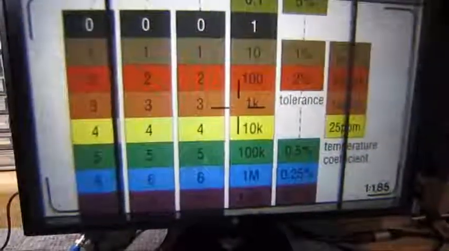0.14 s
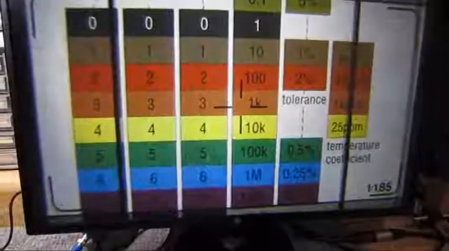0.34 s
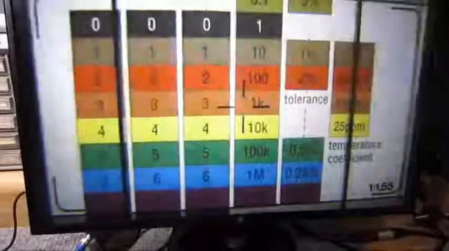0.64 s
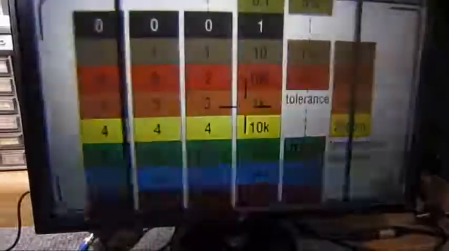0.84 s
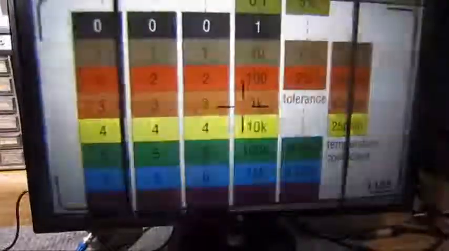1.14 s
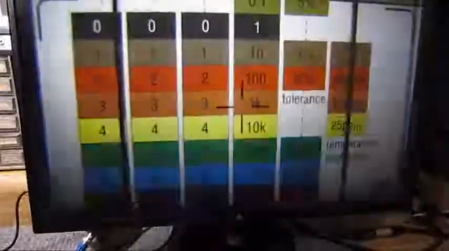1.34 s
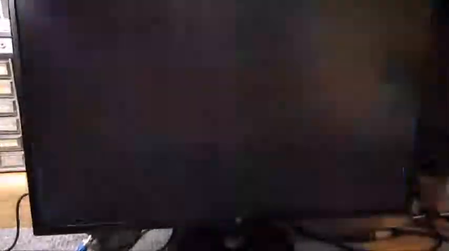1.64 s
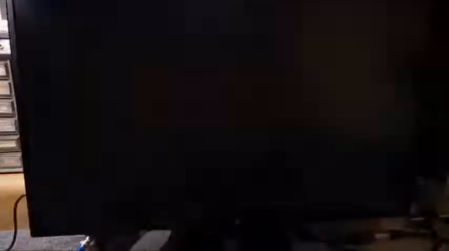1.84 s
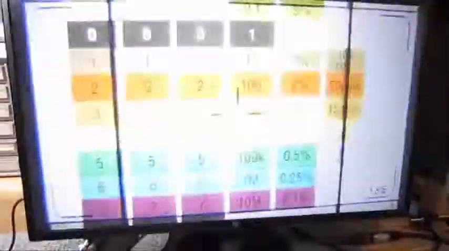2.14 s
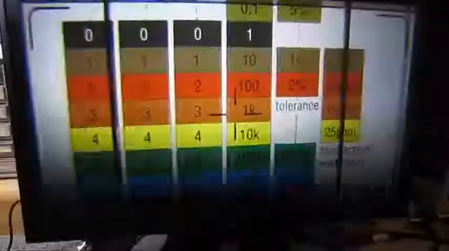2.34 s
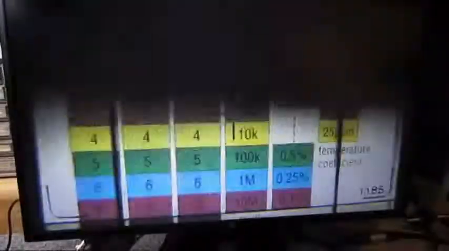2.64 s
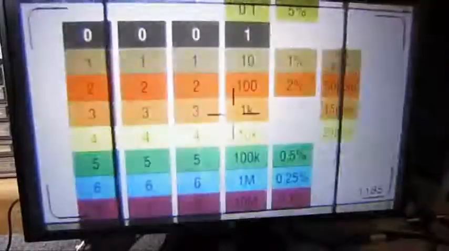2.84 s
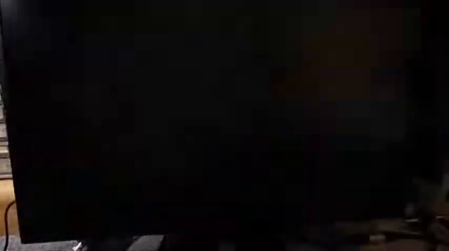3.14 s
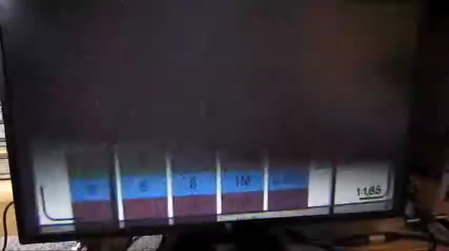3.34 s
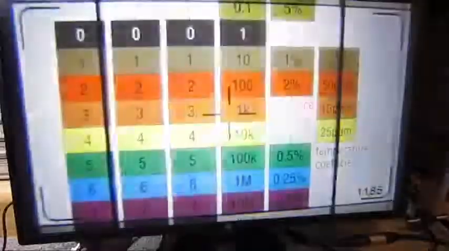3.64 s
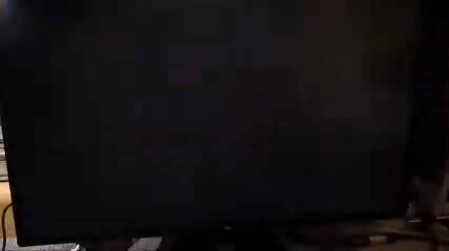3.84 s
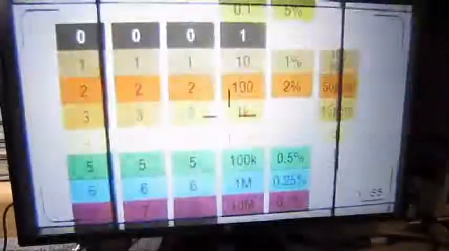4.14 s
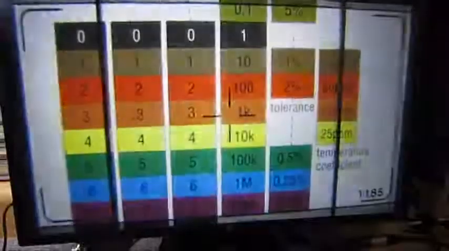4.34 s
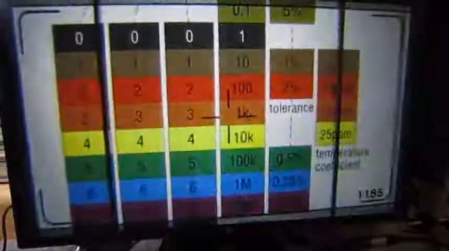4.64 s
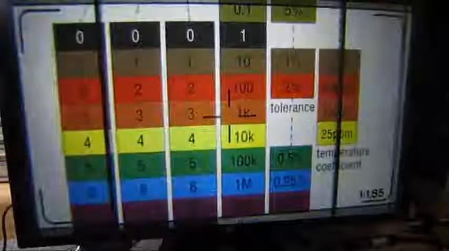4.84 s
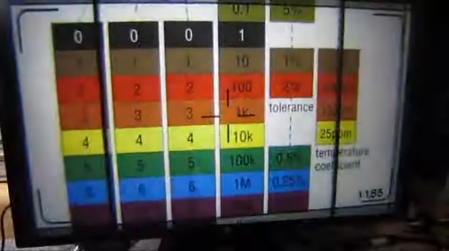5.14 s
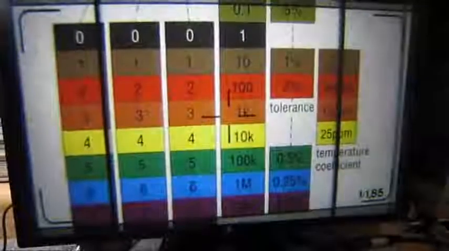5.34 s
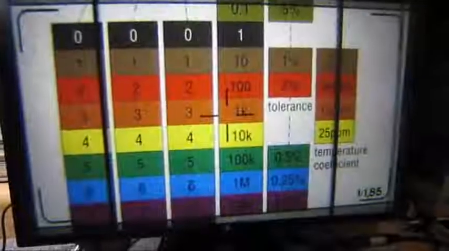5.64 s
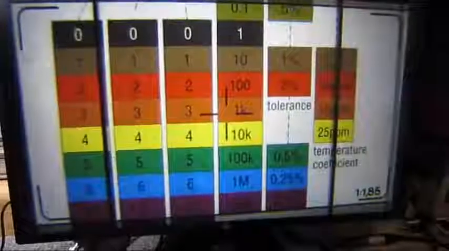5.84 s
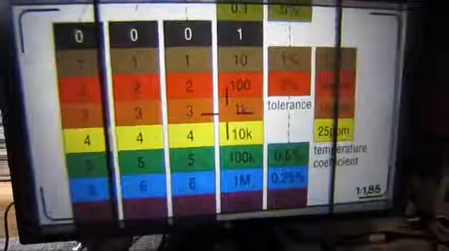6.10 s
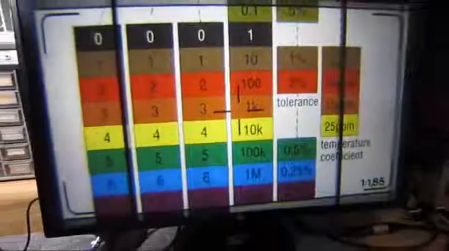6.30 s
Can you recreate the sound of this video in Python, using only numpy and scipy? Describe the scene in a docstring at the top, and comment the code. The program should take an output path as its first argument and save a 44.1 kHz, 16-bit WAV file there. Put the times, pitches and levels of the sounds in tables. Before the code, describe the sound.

A mechanical film camera coasts to a halt indoors: dense metallic chatter around a fast claw tick, slowing into separate weak ticks and dying away. Eleven irregularly spaced short jerks follow, each a tight cluster of dull clunks and grinding rattle, thumping the table softly. The camera sits left of a close stereo pair, with little reverberation. A steady low hiss and hum carry on alone until a tiny bright tick.

```python
"""Coasting and jogging of a film camera

A camera on the left in a quiet room coasts to a stop: random tooth impacts excite the housing modes,
a claw ticks once a turn, and rattle, ticks and shaft hum all follow one decaying speed.
One bright snap near the switch release and one faint bright tick near the end are noise bursts.
Eleven jerks of the motor combine blows, rattle, ringing plates and a table thump.
Sparse reflections and a steady noise floor with faint tones form the room.
"""
import sys
import numpy as np
from scipy import signal
from scipy.io import wavfile
from scipy.ndimage import uniform_filter1d

SR = 44100
rng = np.random.default_rng(int(sys.argv[2]) if len(sys.argv) > 2 else 0)


def output_pcm(signal):
    """Save a mono or channel-first signal as 16-bit PCM at the path in sys.argv[1].

    Samples are clipped to [-1, 1] before scaling.
    """
    pcm = np.clip(np.atleast_2d(signal).T, -1, 1) * 32767
    wavfile.write(sys.argv[1], SR, np.round(pcm).astype(np.int16))


N = 285270

# All levels are source levels, before filtering, stereo placement and reflections.
# Steady floor of room and microphone, relative spectrum: [f/Hz, level/dB per Hz]
FLOOR_SPECTRUM = [(12, -39), (30, -15.5), (65, -1.5), (100, -5.5), (210, -2), (300, -5.5), (700, -9.5),
                  (1100, -14), (1460, -12.5), (1620, -16.5), (1850, -15.5), (2150, -20.5), (2620, -24.5),
                  (2900, -25.5), (3280, -27), (3800, -30), (8500, -37), (10000, -46.5), (13000, -99)]
# Left-right correlation of the floor, negative in opposite phase: [f/Hz, correlation/1]
FLOOR_LIKENESS = [(30, 0.13), (60, -0.43), (130, -0.67), (600, -0.74), (1280, -0.67), (2750, -0.39),
                  (5900, 0.11), (12700, -0.49)]
# Left minus right level of the floor: [f/Hz, level/dB]
FLOOR_LEAN = [(60, 0), (870, 1), (12700, 0.5)]
# Faint steady tones in the room: [f/Hz, level/dB rms]
TONES = [(210, -74), (1455, -85), (1824, -82.5), (1896, -84)]
# Modes of the housing, relative to the plain sound, before the ringing factor: [f/Hz, level/dB, t60/s]
HOUSING_MODES = [(451, -1, 0.33), (556, 2.5, 0.043), (672.5, 3.5, 0.1), (788, 11.5, 0.067), (916, 2, 0.11),
                 (1107, 3.5, 0.076), (1289, 1.5, 0.084), (1350, -4, 0.049), (1462, 8, 0.075),
                 (1690, 11.5, 0.21), (1744, 12.5, 0.11), (1812, 8.5, 0.095), (1893, 10, 0.052),
                 (2007, 14, 0.14), (2260, 9.5, 0.024), (2510, 8.5, 0.011), (2728, 11.5, 0.027),
                 (2987, 9, 0.048), (3450, -3, 0.03), (4200, -2, 0.09), (5560, 1, 0.013), (7370, -25, 0.06)]
# Coasting rattle, relative spectrum: [f/Hz, level/dB per Hz]
GEAR_SPECTRUM = [(35, -61), (60, -16), (156, -12), (230, -20), (340, -28.5), (548, -9.5), (1010, -7.5),
                 (1330, 0), (1460, 0.5), (1560, -3.5), (1670, -3.5), (1740, -1.5), (2000, -13), (2100, -12),
                 (2250, -17.5), (3500, -26.5), (4550, -30), (7700, -120)]
# Treble of the teeth while coasting, relative spectrum: [f/Hz, level/dB per Hz]
SIZZLE_SPECTRUM = [(1470, -13), (2500, -4.5), (4070, -3), (4390, -6.5), (5680, -7.5), (8790, -12.5),
                   (11100, -23.5), (12100, -24), (13200, -26)]
# Low gear growl, relative spectrum: [f/Hz, level/dB per Hz]
GROWL_SPECTRUM = [(150, -19.5), (240, -28), (340, -6.5), (430, 2), (540, -2.5), (700, -12.5), (1200, -61.5)]
# Course of the growl, silent after the last point: [t/s, level/dB]
GROWL_LEVEL = [(0, -43), (.3, -55.5), (.8, -56), (1.15, -52), (1.5, -64), (1.8, -63), (2.0, -72),
               (2.15, -77)]
# Load on the gears round one turn: [share of the turn/1, rattle level/dB, treble level/dB]
TURN_LOAD = [(0, 0.5, -1), (.04, 0.5, 0.5), (.13, -2.5, 1.5), (.19, -1, -5.5), (.3, -0.5, 1), (.4, -3, 0),
             (.53, 0, -3.5), (.6, -1.5, -1), (.7, -0.5, -1.5), (.9, -2.5, -3)]
# Shaft hum at full speed: [multiple of the turn rate/1, level/dB rms]
SHAFT_ORDERS = [(3, -62.5), (4, -58.5), (5, -64.5), (7, -71)]
# Backlash knocks in every turn, relative to TURN_KNOCK: [share of the turn/1, level/dB]
TURN_SLACK = [(0.014, -13), (.27, -8), (0.552, -9.5), (0.797, -14)]
# Small parts that ping in each turn, level against the claw, mean frequency:
# [share of the turn/1, level/dB, f/Hz, t60/s]
PINGS = [(0, -3, 3450, 0.03), (0.072, -7, 3450, 0.019), (0.301, -8, 4160, 0.022), (0.581, -6, 3080, 0.021)]
# Single backlash knocks during the coasting, loud and faint, grit relative to the lid:
# [t/s, lid level/dB, lid f/Hz, grit level/dB, panel f/Hz, panel level/dB]
KNOCKS = [(0.0155, -24, 1694, -4, 1260, -26.5), (0.025, -24, 1795, -9, 1294, -22.5),
          (0.0488, -25, 1774, -7, 1350, -27), (0.0575, -20.5, 1740, -7.5, 1460, -36),
          (0.0784, -30, 1830, -9, 1290, -25), (0.1203, -28, 1700, -9, 1350, -26),
          (0.1722, -26, 1760, -9, 1280, -32), (0.1849, -25, 1690, -8, 1360, -36),
          (0.2146, -35, 1760, -9, 1420, -37), (0.2291, -29, 1720, -11, 1350, -33),
          (0.2543, -31, 1680, -9, 1480, -37), (0.2713, -25, 1690, -15, 1300, -28),
          (0.2996, -30, 1870, -9, 1264, -41), (0.3153, -32, 1710, -17, 1310, -37),
          (0.3406, -22.5, 1720, -11, 1410, -34), (0.3607, -28, 1737, -9, 1460, -36),
          (0.395, -31, 1790, -10, 1285, -38), (0.4102, -34, 1740, -5, 1444, -38),
          (0.4452, -36, 1777, -9, 1450, -36), (0.4572, -32, 1680, -5, 1330, -39),
          (0.4852, -30, 1720, -7, 1280, -33), (0.5083, -31.5, 1695, -5, 1415, -35),
          (0.5363, -27.5, 1690, -3.5, 1460, -41), (0.5504, -32, 1760, -6, 1370, -36),
          (0.5648, -36, 1720, -12, 1450, -40), (0.6033, -35, 1800, -6, 1290, -41),
          (0.6166, -28, 1726, -8, 1390, -43), (0.6725, -26.5, 1737, -10, 1190, -43),
          (0.6904, -33, 1704, -12, 1410, -37), (0.72, -33, 1810, -16, 1385, -42),
          (0.7343, -32, 1710, -6, 1480, -35), (0.7844, -39, 1730, -9, 1520, -34),
          (0.8161, -34, 1690, -13, 1470, -43), (0.8387, -36, 1700, -9, 1390, -43),
          (0.8585, -31, 1720, -8, 1300, -41), (0.9088, -31, 1790, -6, 1400, -41),
          (0.9284, -34, 1730, -11, 1450, -42), (0.9762, -37, 1700, -6, 1424, -41),
          (0.9971, -32, 1650, -13, 1390, -43), (1.0156, -34, 1870, -6, 1440, -37),
          (1.0555, -34, 1720, -7, 1440, -38), (1.072, -33, 1700, -9, 1440, -46),
          (1.103, -41, 1750, -9, 1270, -43), (1.1323, -30.5, 1730, -9, 1440, -44),
          (1.1753, -35, 1820, -9, 1300, -45), (1.2131, -42, 1770, -9, 1240, -52),
          (1.239, -41, 1700, -12, 1454, -41), (1.27, -41, 1730, -5, 1460, -45),
          (1.3142, -32.5, 1740, -11, 1260, -43), (1.3426, -34.5, 1730, -16, 1290, -48),
          (1.369, -43, 1750, -9, 1210, -43), (1.4212, -41, 1620, -9, 1470, -50),
          (1.4506, -39.5, 1704, -12, 1480, -52), (1.474, -42, 1750, -9, 1315, -52),
          (1.4844, -43, 1820, -9, 1440, -53), (1.5186, -47, 1760, -12, 1280, -55),
          (1.5444, -46, 1730, -13, 1410, -52), (1.5743, -42.5, 1740, -10, 1290, -58),
          (1.6112, -51, 1820, -13, 1290, -59), (1.7025, -42, 1820, -12, 1410, -54),
          (1.7207, -46, 1805, -9, 1280, -60), (1.7398, -49, 1750, -6, 1350, -51),
          (1.7864, -53, 1730, -9, 1260, -52), (1.8404, -48, 1730, -3, 1200, -48.5),
          (1.8687, -54, 1730, -7, 1450, -63), (1.9495, -52, 1820, -9, 1370, -60)]
# A bright snap near the switch release and a faint bright tick near the end: [t/s, level/dB, t60/s]
SNAPS = [(0.173, -31.5, 0.074), (6.36, -60, 0.023)]
# Snap and bright tick, relative spectrum: [f/Hz, level/dB per Hz]
SNAP_SPECTRUM = [(1470, -47), (2500, 2), (4910, -14), (5370, 0.5), (6520, -13.5), (7810, 0.5),
                 (11300, -20.5), (13200, -12)]
# A part settling at rest: [t/s, level/dB]
SETTLING = [(6.421, -52), (6.427, -58), (6.434, -53)]
# Jogs of the motor: [t/s at the start, hold/s, rattle level/dB, treble level/dB, thump level/dB]
JOGS = [(2.177, 0.038, -43, -60.5, -51.5), (2.413, 0.059, -46, -65, -57), (2.566, 0.025, -39, -55.5, -49),
        (2.834, 0.043, -43.5, -62.5, -52), (3.054, 0.042, -42.5, -62, -52), (3.23, 0.055, -46, -67, -51.5),
        (3.509, 0.037, -41.5, -61, -52.5), (3.729, 0.041, -43, -62.5, -51),
        (3.898, 0.034, -40.5, -56.5, -49), (4.074, 0.031, -40.5, -61, -49), (4.229, 0.028, -43.5, -64, -49)]
# Blows as slack is taken up in the jogs, and faint ticks between them: [t/s, grit level/dB, panel f/Hz,
# panel level/dB, lid f/Hz, lid level/dB, base f/Hz, base level/dB, door level/dB, treble tick level/dB]
BLOWS = [(2.184, -32, 1306, -31, 1750, -33.5, 534, -33, -43, -56),
         (2.193, -36.5, 1310, -35, 1620, -47, 360, -42, -49, -61.0),
         (2.204, -35, 1113, -36.0, 1740, -48.5, 480, -45.5, -46, -63.5),
         (2.216, -37, 1315, -47, 1730, -44, 520, -52, -52, -61),
         (2.226, -48, 1300, -48, 1690, -56, 510, -50.0, -52.5, -68.5),
         (2.297, -55.0, 1390, -62.0, 1660, -55, 540, -60.0, -68.0, -72),
         (2.419, -31, 1275, -47, 1700, -42.0, 456, -39, -49, -63.5),
         (2.43, -43, 1286, -43, 1770, -47.5, 368, -47.0, -59, -66.0),
         (2.444, -42, 1103, -40, 1710, -46.0, 430, -52, -62, -65.5),
         (2.468, -51, 1300, -53, 1750, -50.0, 370, -48, -63, -67.5),
         (2.573, -28.5, 1283, -30.0, 1700, -36, 390, -37, -51, -52.5),
         (2.588, -35, 1268, -27, 1820, -37, 390, -49, -33, -62),
         (2.596, -31.5, 1295, -34, 1690, -39, 407, -43.5, -49, -61.0),
         (2.605, -39, 1303, -41, 1730, -42, 460, -41, -44.5, -58),
         (2.622, -44.5, 1290, -50, 1890, -48, 398, -54, -59.0, -57),
         (2.842, -31, 1293, -31, 1710, -35, 378, -45, -42, -63),
         (2.852, -39, 1280, -41, 1640, -41.5, 360, -45, -51.0, -57.5),
         (2.865, -37.5, 1293, -47, 1700, -49.5, 442, -40, -56.0, -61),
         (2.876, -45, 1260, -42, 1660, -48, 365, -49, -58.5, -68.5),
         (2.895, -50, 1280, -57, 1750, -46.5, 410, -56, -52.5, -64),
         (3.063, -34, 1290, -32.5, 1670, -34, 552, -38, -49.0, -52),
         (3.073, -42, 1280, -43, 1720, -48.0, 357, -44, -59, -65.5),
         (3.089, -45, 1125, -46, 1680, -41, 458, -44.0, -55.5, -65.0),
         (3.105, -49, 1260, -50.0, 1910, -56.5, 413, -45, -55.5, -68.5),
         (3.234, -39, 1320, -40.5, 1780, -49, 540, -44, -47, -68.5),
         (3.245, -36, 1297, -42.5, 1780, -56, 354, -43.5, -57, -69.0),
         (3.263, -34, 1340, -42.0, 1720, -42.5, 457, -39, -50.0, -60),
         (3.279, -42, 1300, -38.5, 1860, -49.0, 390, -39, -57.0, -63),
         (3.295, -50, 1284, -47.5, 1760, -42, 425, -59, -56.0, -64),
         (3.315, -60, 1310, -61, 1740, -51, 360, -62.0, -61.5, -71.0),
         (3.405, -57.5, 1260, -66, 1680, -55, 460, -61.5, -68.5, -73.5),
         (3.512, -33.5, 1290, -32.5, 1734, -41.5, 561, -32, -50, -64.5),
         (3.527, -41, 1295, -32.5, 1740, -40, 539, -33.5, -52.0, -62.0),
         (3.547, -44, 1280, -49, 1660, -44, 453, -41, -37, -66.5),
         (3.568, -50, 1340, -52, 1830, -52.0, 497, -54, -45, -67.5),
         (3.594, -51.0, 1320, -54, 1810, -60, 450, -58.0, -65.0, -69.0),
         (3.735, -31.5, 1277, -36, 1730, -39.0, 534, -34, -53, -55),
         (3.748, -33.5, 1300, -42, 1750, -46.0, 360, -46, -57.5, -64.5),
         (3.766, -40, 1370, -43, 1690, -39, 450, -47, -58, -62.5),
         (3.776, -54, 1040, -53, 1670, -49.5, 398, -52, -47, -67.5),
         (3.79, -47, 1070, -59, 1630, -52.5, 424, -51.5, -59.0, -68.0),
         (3.905, -31.0, 1332, -28, 1720, -37, 528, -36, -34, -59.0),
         (3.914, -32, 1292, -28.5, 1705, -28, 500, -41, -45, -53),
         (3.928, -38, 1330, -32, 1800, -47.5, 420, -44.5, -48.5, -62.5),
         (3.942, -45, 1276, -44, 1780, -46, 430, -46, -53.5, -63.5),
         (3.962, -57, 1294, -46, 1920, -51.0, 372, -47, -57.0, -68.5),
         (4.08, -33, 1299, -39, 1690, -47, 440, -41, -44, -58.5),
         (4.091, -42, 1307, -38.0, 1690, -46.5, 540, -44.5, -54, -62.0),
         (4.1, -38.5, 1073, -37, 1675, -36, 403, -39, -54, -64),
         (4.109, -42, 1072, -37.5, 1670, -50, 554, -50, -54, -55),
         (4.135, -55, 1293, -50, 1710, -56.5, 510, -59, -64, -60),
         (4.235, -34.5, 1440, -43.5, 1690, -48, 439, -41, -50, -63.5),
         (4.245, -39.0, 1292, -43, 1680, -46, 453, -44, -46.0, -67.0),
         (4.253, -41, 1260, -40, 1920, -44, 500, -50.0, -51, -62.5),
         (4.262, -35, 1105, -52, 1710, -48, 500, -49, -43, -64),
         (4.285, -47, 1050, -61, 1720, -61.5, 500, -48, -63, -69)]
# Jog rattle, relative spectrum: [f/Hz, level/dB per Hz]
JERK_SPECTRUM = [(120, -13), (200, -21.5), (410, -1), (703, -9.5), (774, -7.5), (972, -6), (1280, -2),
                 (1550, -10), (1750, -9.5), (2040, -15), (2700, -20), (3500, -30.5), (4550, -105),
                 (7700, -120)]
# Jog treble, relative spectrum: [f/Hz, level/dB per Hz]
CHATTER_SPECTRUM = [(2000, -40), (3000, -5.5), (4000, -5), (5300, -1.5), (6500, -9), (9000, -9.5),
                    (11000, -18), (13200, -14)]

FLOOR_DB = -52.5  # rms
# Steady speed until the switch is released, then friction and drag
RUN_TURNS_PER_S, FIRST_TURN_S, RELEASE_S = 23.234, .0408, .1813
FRICTION_TURNS_PER_S2, DRAG_PER_S = 11.3545, .02354
# Layers of the coasting: (level/dB at full speed, dB per dB of speed)
RATTLE, TREBLE, CLAW_TICK = (-34, 1.73), (-44.5, 2.24), (-44, 1.8)
TURN_KNOCK, SHAFT = (-31, 1.3), (0, 16)
CLAW_FULL_DB = -5  # the claw weakens only below this speed, relative to full speed
KNOCK_SPREAD_DB, PING_SPREAD_DB, PING_SPREAD = 0.5, 2.0, 0.011  # chance from turn to turn; last: of f
PING_TICK_DB = -3.5  # the tick that starts each ping, against the ping
KNOCK_LID_T60, KNOCK_LID_RISE_S = 0.048, 0.0014
KNOCK_PANEL_T60, KNOCK_PANEL_RISE_S = 0.062, 0.0018
JOG_RISE_S, JOG_SAG_DB_PER_S, JOG_FALL_DB_PER_S = .0075, -71, -330
TREBLE_SAG_DB_PER_S, TREBLE_FALL_DB_PER_S = -120, -600
BLOW_DULL_HZ, BLOW_TICK_T60 = 2250, 0.027  # blows are softer than tooth impacts
PANEL_T60, LID_T60, BASE_T60, DOOR_HZ, DOOR_T60 = 0.073, 0.053, 0.052, 775, 0.052
# The table under the camera: mean frequency, its spread and its decay
THUMP_HZ, THUMP_SPREAD, THUMP_RISE_S, THUMP_T60 = 142, .03, 0.0023, 0.32
EDGE_HZ = 13250  # upper band limit


def gain_of(db):
    """Definition of the decibel: amplitude ratio from level."""
    return 10 ** (np.asarray(db) / 20)


def evened(x):
    """Normalisation to an rms value of 1."""
    return x / np.sqrt(np.mean(x ** 2) + 1e-20)


def read(points, hz):
    """Linear interpolation of a spectrum along a logarithmic frequency axis."""
    f, value = np.transpose(points)
    return np.interp(np.log(hz + 1), np.log(f + 1), value)


def colour(points):
    """Minimum phase: a causal filter of energy 1 follows from its log spectrum by Hilbert transform."""
    hz = abs(np.fft.fftfreq(8192, 1 / SR))
    log_gain = np.log(gain_of(np.maximum(read(points, hz), -100)))
    spectrum = np.exp(np.conj(signal.hilbert(log_gain)))
    taps = np.fft.ifft(spectrum).real[:4096]
    return taps / np.linalg.norm(taps)


def through(x, taps):
    """Linear filtering by convolution, cut to the input length."""
    return signal.oaconvolve(x, taps)[:len(x)]


def housed(taps, ringing=0.56):
    """Modal superposition: decaying housing modes join the direct impulse; energy 1."""
    t = np.arange(8192) / SR
    body = 1. * (t == 0)
    for hz, db, t60 in HOUSING_MODES:
        decay = np.log(1000) / t60
        mode = np.exp(-decay * t) * np.cos(2 * np.pi * hz * t)
        body = body + ringing * gain_of(db) * 2 * decay / SR * mode
    both = signal.fftconvolve(body, taps)
    return both / np.linalg.norm(both)


def add(mix, s, sound):
    """Superposition of a sound from a given time."""
    part = mix[round(s * SR):][:len(sound)]
    part += sound[:len(part)]


def ring(hz, db, t60, rise):
    """Damped oscillation of one mode, with an exponential onset."""
    t = np.arange(9000) / SR
    return gain_of(db - 60 * t / t60) * (1 - np.exp(-t / rise)) * np.sin(2 * np.pi * hz * t)


def strikes(rows, t60, rise=0.00035):
    """Impact noise: each event is a decaying burst of random signs."""
    out, t = np.zeros(N), np.arange(4000) / SR
    grits = rng.choice([-1., 1.], (len(rows), len(t)))
    for (s, db, *_), grit in zip(rows, grits):
        add(out, s, gain_of(db - 60 * t / t60) * (1 - np.exp(-t / rise)) * grit)
    return out


def teeth(per_s, spread_db, smooth, speed=1.):
    """Shot noise: random tooth impacts, a few of them large, over sliding noise; rms 1."""
    size_draw, sign_draw, time_draw = rng.random((3, N))
    size_db = spread_db * np.minimum(-np.log(1 - size_draw), 4)
    size = gain_of(size_db) * np.sign(sign_draw - .5)
    impacts = size * (time_draw < per_s / SR) / np.sqrt(speed)  # denser impacts, equal power
    return evened(evened(impacts) + smooth * rng.standard_normal(N))


def hum():
    """Stationary partially correlated noise, shaped in the short-time spectrum with faint drifting patches."""
    frames, hz = N // 512 + 5, np.fft.rfftfreq(2048, 1 / SR)
    a, b, c, d, patches = rng.standard_normal((frames, 1025, 5)).T
    patches = uniform_filter1d(patches, size=20, axis=0)  # along frequency
    patches = evened(uniform_filter1d(patches, size=8, axis=1))  # along time
    same = np.clip(read(FLOOR_LIKENESS, hz), -1, 1)[:, None]
    left = a + 1j * b
    right = same * left + np.sqrt(1 - same ** 2) * (c + 1j * d)
    z = np.array([left, right])
    z *= gain_of(read(FLOOR_SPECTRUM, hz)[:, None] + .8 * patches)
    z *= gain_of(np.outer([.5, -.5], read(FLOOR_LEAN, hz)))[:, :, None]
    noise = signal.istft(z, nperseg=2048, noverlap=1536)[1][:, :N]
    return gain_of(FLOOR_DB) * evened(noise)


def tones():
    """Steady sinusoids: faint whistles from equipment in the room."""
    t = np.arange(N) / SR
    return sum(np.sqrt(2) * gain_of(db) * np.sin(2 * np.pi * (hz * t + rng.random())) for hz, db in TONES)


def rotation():
    """Rotational dynamics: friction and speed-proportional drag slow the shaft after the release."""
    t = np.arange(N) / SR
    rest = FRICTION_TURNS_PER_S2 / DRAG_PER_S
    coast_s = np.maximum(t - RELEASE_S, 0)
    speed = np.maximum((RUN_TURNS_PER_S + rest) * np.exp(-DRAG_PER_S * coast_s) - rest, 1e-3)
    turn = np.cumsum(speed) / SR - FIRST_TURN_S * RUN_TURNS_PER_S
    return t, speed, turn, 20 * np.log10(speed / RUN_TURNS_PER_S)


def level(layer, slow_db):
    """Power law of speed: a layer's level is linear in the speed level."""
    return layer[0] + layer[1] * slow_db


def turn_events(t, turn, slow_db):
    """Periodic impact excitation: claw, slack and pinging parts act at fixed angles of each turn."""
    rings, ticks, claw, knocks = np.zeros(N), [], [], []
    chances = rng.standard_normal((int(turn[-1]) + 1, len(TURN_SLACK) + len(PINGS), 2))
    for k, chance in enumerate(chances):
        when = lambda share: np.interp(k + share, turn, t)
        slow = lambda share: np.interp(k + share, turn, slow_db)
        claw_db = level(CLAW_TICK, min(slow(0) - CLAW_FULL_DB, 0))
        claw.append((when(0), claw_db))
        for (share, db), (louder, _) in zip(TURN_SLACK, chance):
            knock_db = level(TURN_KNOCK, slow(share)) + db + KNOCK_SPREAD_DB * louder
            knocks.append((when(share), knock_db))
        for (share, db, hz, t60), (louder, higher) in zip(PINGS, chance[len(TURN_SLACK):]):
            ping_hz, ping_db = hz * (1 + PING_SPREAD * higher), claw_db + db + PING_SPREAD_DB * louder
            add(rings, when(share), ring(ping_hz, ping_db, t60, 0.00031))
            ticks.append((when(share), claw_db + db + PING_TICK_DB + louder))
    return rings, ticks, claw, knocks


def coasting():
    """Forced vibration of the housing: meshing teeth, knocks and ticks excite it as the speed falls."""
    t, speed, turn, slow_db = rotation()
    share, low_load, high_load = np.transpose(TURN_LOAD)
    low_db = level(RATTLE, slow_db) + np.interp(turn, share, low_load, period=1)
    high_db = level(TREBLE, slow_db) + np.interp(turn, share, high_load, period=1)
    rings, ticks, claw, knocks = turn_events(t, turn, slow_db)
    for s, lid_db, lid_hz, grit_db, panel_hz, panel_db in KNOCKS:
        add(rings, s, ring(lid_hz, lid_db, KNOCK_LID_T60, KNOCK_LID_RISE_S))
        add(rings, s, ring(panel_hz, panel_db, KNOCK_PANEL_T60, KNOCK_PANEL_RISE_S))
        knocks.append((s, lid_db + grit_db))
    meshing = np.maximum(speed, 2)  # teeth meet in proportion to the speed, down to 2 turns/s
    low = gain_of(low_db) * teeth(45 * meshing, 0.21, 0.71, meshing)
    low += strikes(knocks, 0.049, rise=0.0012)
    high = gain_of(high_db) * teeth(70 * meshing, 1.6, 0.93, meshing)
    high += strikes(claw, 0.039, rise=0.00088)
    high += strikes(ticks, 0.025)  # each ping starts with a wide tick
    growl = gain_of(np.interp(t, *np.transpose(GROWL_LEVEL), right=-200)) * teeth(600, 3.5, 1.0)
    shaft = np.zeros(N)
    for order, db in SHAFT_ORDERS:
        phase = 2 * np.pi * (order * turn + rng.random())
        shaft += np.sqrt(2) * gain_of(db + level(SHAFT, slow_db)) * np.sin(phase)
    rattle = through(low, housed(colour(GEAR_SPECTRUM), ringing=0.55))
    treble = through(high, housed(colour(SIZZLE_SPECTRUM)))
    return rattle + treble + rings + through(growl, housed(colour(GROWL_SPECTRUM))) + shaft


def snaps():
    """Filtered impact noise: a bright snap and a faint bright tick, each with its own decay, and duller ticks."""
    bright = through(sum(strikes([(s, db)], t60) for s, db, t60 in SNAPS), colour(SNAP_SPECTRUM))
    dull = colour([(700, -13), (1500, 0), (4500, -19), (6500, -39)])
    return bright + through(strikes(SETTLING, 0.021), dull)


def jog_levels():
    """Exponential envelopes: rattle and treble rise fast, sag through the hold and fall away."""
    out, t = np.zeros((2, N)), np.arange(12000) / SR
    for s, hold, rattle_db, treble_db, _ in JOGS:
        held, after = np.minimum(t, hold), np.maximum(t - hold, 0)
        rise = np.minimum(t / JOG_RISE_S, 1) ** 2
        add(out[0], s, rise * gain_of(rattle_db + JOG_SAG_DB_PER_S * held + JOG_FALL_DB_PER_S * after))
        add(out[1], s, rise * gain_of(treble_db + TREBLE_SAG_DB_PER_S * held + TREBLE_FALL_DB_PER_S * after))
    return out


def jogging():
    """Impulsive excitation of plates: blows ring panel, lid, base and film door; each jerk thumps the table."""
    rattle, treble = jog_levels()
    rings = np.zeros(N)
    blows = strikes(BLOWS, 0.034, rise=0.0024)
    blows = signal.lfilter(*signal.butter(2, BLOW_DULL_HZ, fs=SR), blows)
    for s, _, panel_hz, panel_db, lid_hz, lid_db, base_hz, base_db, door_db, _ in BLOWS:
        add(rings, s, ring(base_hz, base_db, BASE_T60, 0.003))
        add(rings, s, ring(DOOR_HZ, door_db, DOOR_T60, 0.0023))
        add(rings, s, ring(panel_hz, panel_db, PANEL_T60, 0.0026))
        add(rings, s, ring(lid_hz, lid_db, LID_T60, 0.002))
    ticks = [(s, tick_db) for s, *_, tick_db in BLOWS]
    low = rattle * teeth(500, 2.5, 1.0) + blows
    high = treble * teeth(1100, 1.5, 0.66) + strikes(ticks, BLOW_TICK_T60, rise=0.0017)
    thump = np.zeros(N)
    for (s, *_, thump_db), higher in zip(JOGS, rng.standard_normal(len(JOGS))):
        add(thump, s, ring(THUMP_HZ * (1 + THUMP_SPREAD * higher), thump_db, THUMP_T60, THUMP_RISE_S))
    low = through(low, housed(colour(JERK_SPECTRUM), ringing=0.51))
    high = through(high, housed(colour(CHATTER_SPECTRUM)))
    return low + high + rings, thump


def room(x, t60):
    """Reverberation: sparse decaying reflections of random sign, independent at each microphone."""
    taps = np.zeros((2, 9000))
    at = np.arange(40, 8980, 20) + rng.integers(0, 20, (2, 447))
    np.put_along_axis(taps, at, rng.choice([-1., 1.], at.shape), 1)
    taps *= gain_of(-60 * np.arange(9000) / SR / t60)
    return signal.oaconvolve(x[None], taps / np.linalg.norm(taps[0]), axes=1)[:, :N]


def scene():
    """Level and time differences place the camera left; the thump arrives in opposite phase at the pair."""
    jerks, thump = jogging()
    camera = coasting() + jerks + snaps()
    bright = signal.lfilter(*signal.butter(1, 3000, "high", fs=SR), camera)
    # treble reaches the far microphone mostly by reflection; its direct sound is one sample late
    far = np.roll(camera - 0.55 * bright, shift=1)
    direct = np.array([gain_of(4.0) * camera, gain_of(-5.0) * far])
    wet = gain_of([[-9.], [-9.5]]) * room(camera, 0.16)
    wet = wet + gain_of([[-9.], [-8.]]) * room(bright, 0.05)
    return direct + wet + thump * np.array([[2.4], [-.6]]) + hum() + tones()


def record(dry):
    """Band limitation by a linear-phase low-pass filter."""
    taps = signal.firwin(511, EDGE_HZ, window=("kaiser", 9), fs=SR)
    return signal.oaconvolve(dry, taps[None], "same")


dry = scene()
out = record(dry)
output_pcm(out)
```